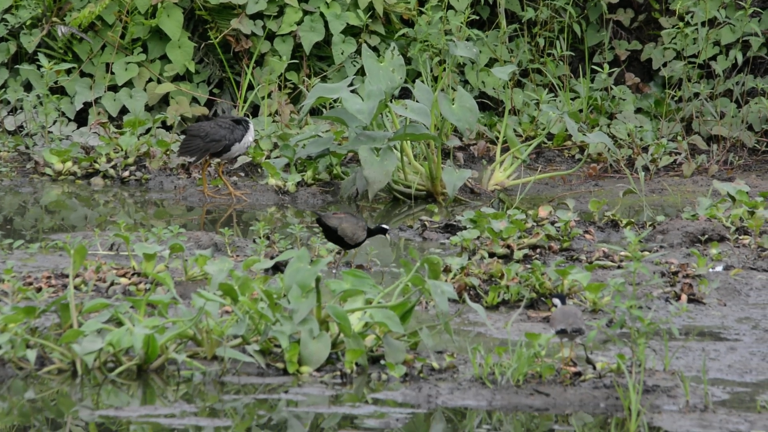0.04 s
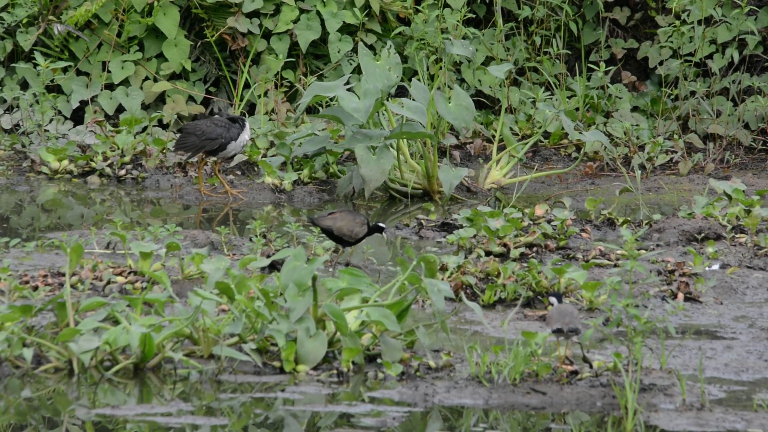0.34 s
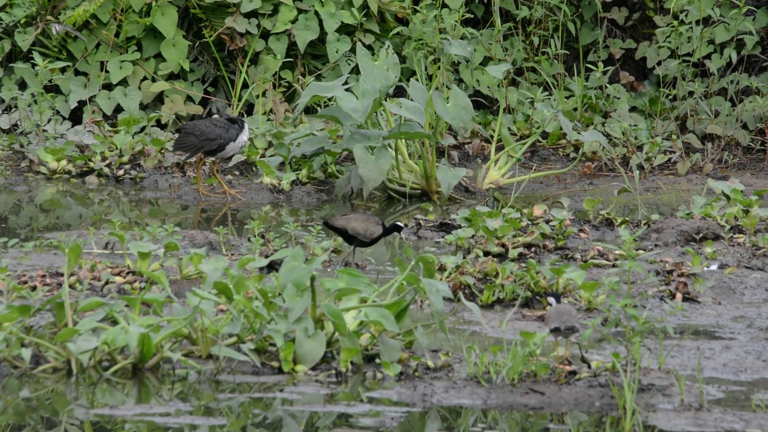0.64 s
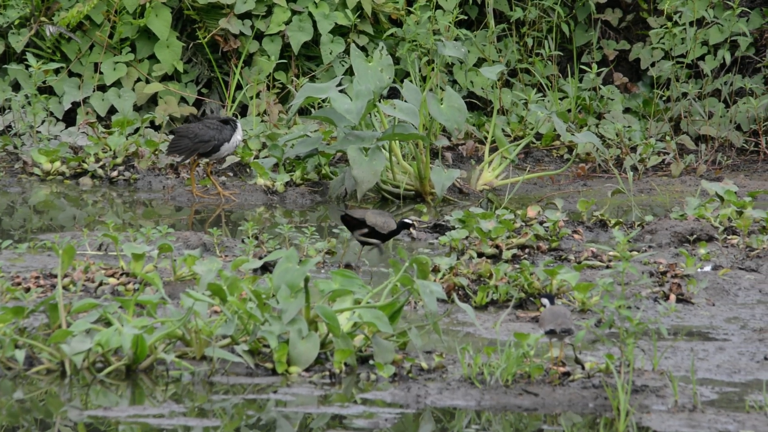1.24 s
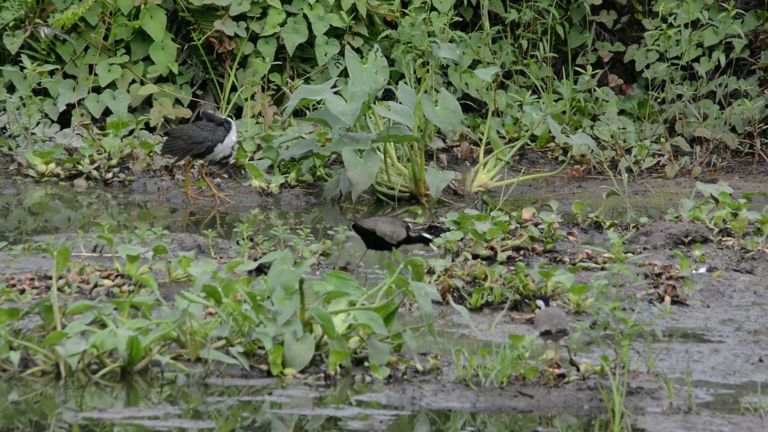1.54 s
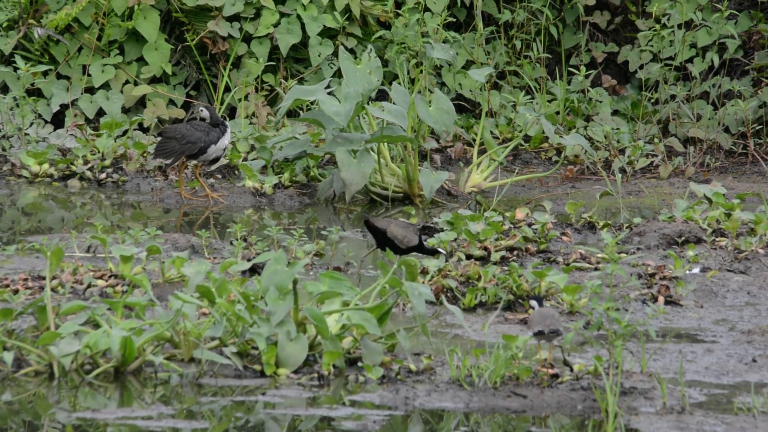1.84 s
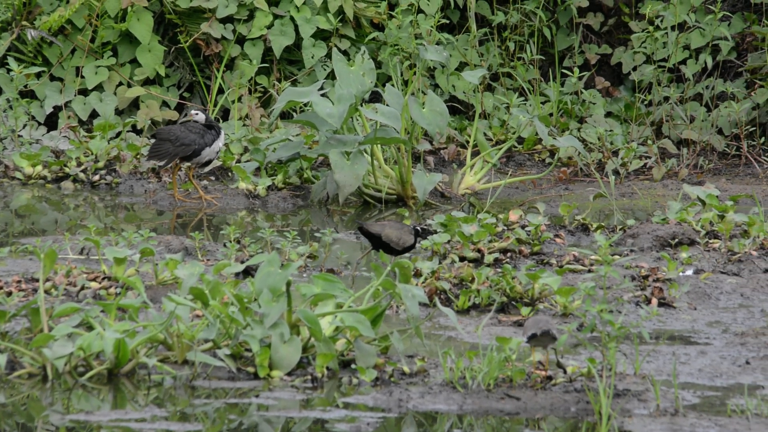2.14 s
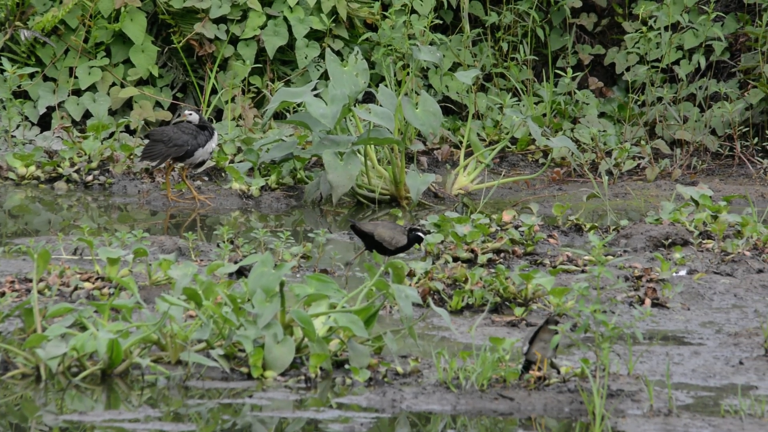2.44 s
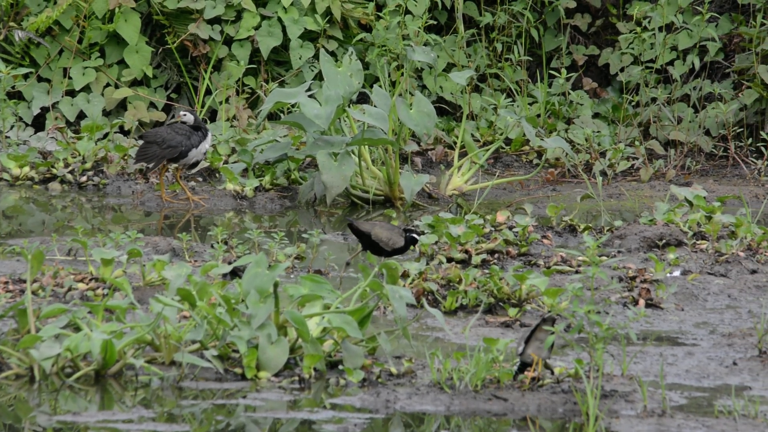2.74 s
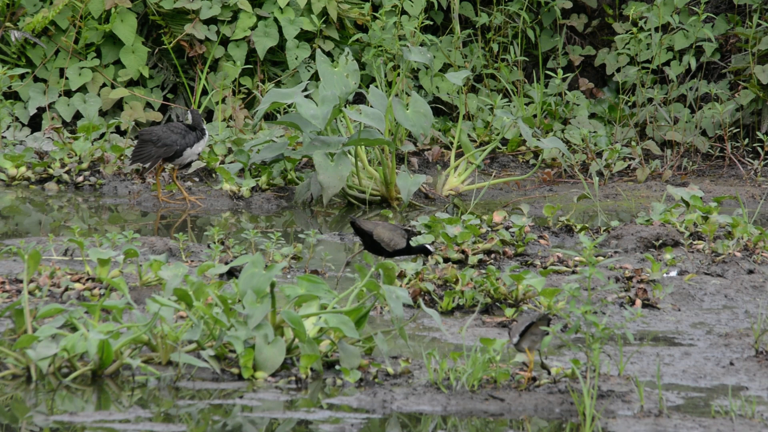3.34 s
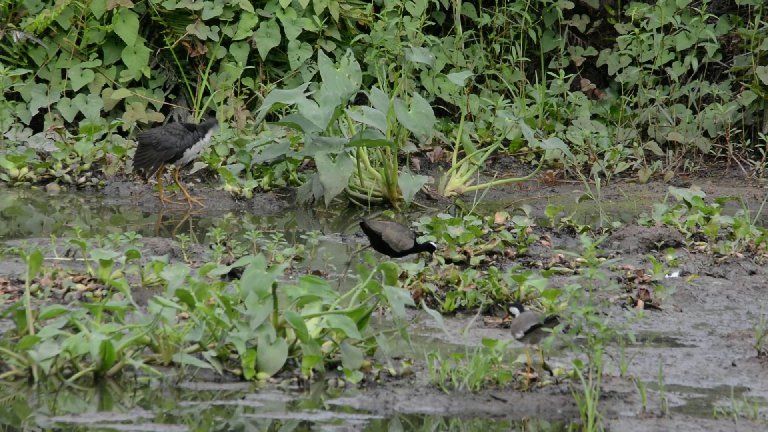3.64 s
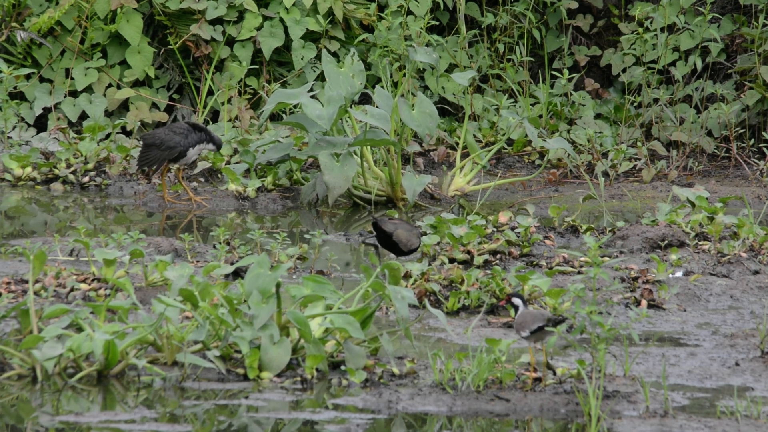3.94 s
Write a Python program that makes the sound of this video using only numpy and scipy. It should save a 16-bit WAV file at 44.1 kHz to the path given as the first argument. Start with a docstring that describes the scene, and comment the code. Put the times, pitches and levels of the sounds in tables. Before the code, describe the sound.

Birds chirp close to the microphone on a marsh bank. Sharp chips and dry bill ticks come first, then slurred whistles, three quick swooping notes and a rasp, over steady shrill insects and faint distant calls.

```python
"""Sharp bird chips close to the microphone, over shrill insects and the low murmur of open air.
The place is the bank of a marsh pond. Nearby come slurred whistles, rising notes, swoops, harsh
rasps and bill ticks; farther off, soft hoots, falling notes and one grunt. Each whistle is the
wavering near-sine of a syrinx; each rasp is hiss with a throat resonance. Foliage scatters every
call, and the wall of leaves across the pond throws back a smeared echo."""
import sys
import numpy as np
from scipy import signal
from scipy.fft import rfft, irfft
from scipy.io import wavfile

SR = 44100
rng = np.random.default_rng(int(sys.argv[2]) if len(sys.argv) > 2 else 0)


def output_pcm(signal):
    """Save a mono or channel-first signal as 16-bit PCM at the path in sys.argv[1].

    Samples are clipped to [-1, 1] before scaling.
    """
    pcm = np.clip(np.atleast_2d(signal).T, -1, 1) * 32767
    wavfile.write(sys.argv[1], SR, np.round(pcm).astype(np.int16))


N = 176400
TIME_S, FREQ_HZ = np.arange(N) / SR, np.fft.rfftfreq(N, 1 / SR)

def undb(db):
    """Decibels to gain."""
    return 10 ** (np.asarray(db) / 20)

def unit(x):
    """Scale to rms 1."""
    return x / np.sqrt(np.mean(x ** 2))

def colour(x, points):
    """Filter by (freq_hz, gain_db) points on a log-frequency axis."""
    hz, db = np.array(points, float).T
    gain_db = np.interp(np.log(np.maximum(FREQ_HZ, 1)), np.log(hz), db)
    return irfft(rfft(x) * undb(gain_db), N)

def noise(points):
    """Coloured noise of rms 1."""
    return unit(colour(rng.standard_normal(N), points))

def band(hz, width_hz):
    """Noise of rms 1 in one steep resonance."""
    skirts = 1 + (1.52 * (FREQ_HZ - hz) / width_hz) ** 4
    return unit(irfft(rfft(rng.standard_normal(N)) / skirts, N))

def walk(rate_hz):
    """Smooth random drift of rms 1, mostly slower than rate_hz."""
    return unit(irfft(rfft(rng.standard_normal(N)) / (1 + (FREQ_HZ / rate_hz) ** 4), N))

def ramp(u):
    """Smooth step from 0 to 1."""
    return np.sin(np.pi / 2 * np.clip(u, 0, 1)) ** 2

def clock(length_s):
    """Sample times of one note."""
    return np.arange(int(length_s * SR) + 1) / SR

def add(out, start_s, x):
    """Mix a sound in at its time."""
    i = int(start_s * SR)
    out[i:i + len(x)] += x[:N - i]

def stereo(mid, side, left_db):
    """Mid and side to the microphone's two channels, the left louder by left_db."""
    return np.array([mid + side, mid - side]) * undb([[left_db / 2], [-left_db / 2]])

# Open air over the pond: freq_hz, gain_db
AIR_SPECTRUM = [(20, -46), (33, -16), (48, -11), (90, -2), (130, -1), (160, -4), (178, -1.5), (193, 2.5),
                (210, -5.5), (240, -4), (500, -1.5), (690, 0), (726, 3), (770, 0), (1250, 0), (1700, -4.5),
                (2900, -6), (4300, -9), (6200, -13), (12500, -23.5), (15500, -18.5)]
# High insect chorus around the microphone: freq_hz, gain_db
CHORUS_SPECTRUM = [(4000, -43), (6200, -18.5), (6800, -4.5), (7400, -10), (8200, -1.5), (8900, 2),
                   (9500, -3.5), (10300, 4), (11000, -3), (11700, -6), (12500, -18), (15500, -30)]
# Waves of the lower insect shrill: time_s, level_db
SHRILL_LEVELS = [(0, -49.5), (.15, -67), (1.1, -65.5), (1.38, -60.5), (1.48, -64.5), (1.8, -58.5),
                 (2.1, -61), (2.5, -60.5), (2.59, -59), (2.7, -65), (2.77, -54.5), (2.91, -64), (2.96, -53),
                 (3.02, -53), (3.11, -64), (3.21, -52.5), (3.27, -55.5), (3.4, -66), (4, -61.5)]
# Stereo width at the microphone, side against mid: freq_hz, gain_db
MARSH_WIDTH = [(30, -11), (100, -21), (300, -11), (700, -11), (1400, -9.5), (3000, -5), (5500, -4.5),
               (9000, -4), (14000, 1)]

def marsh():
    """All round the microphone: open air, a steady insect chorus and a lower shrill in waves."""
    air = undb(-54 + .5 * walk(.67))
    chorus = undb(-53.5 + .17 * walk(9) + .5 * walk(90))
    shrill = undb(np.interp(TIME_S, *np.array(SHRILL_LEVELS).T) + 1.9 * walk(28))
    mid, side = (air * noise(AIR_SPECTRUM) + chorus * noise(CHORUS_SPECTRUM)
                 + shrill * band(hz=5307, width_hz=740) for _ in range(2))
    return stereo(mid, colour(side, MARSH_WIDTH), left_db=1.8)

def leaves(call, wet_db, t60_s=.78):
    """A call reaches the microphone directly, then as many small echoes off the foliage."""
    onset_s, closest_t60_s, echo_s, smear_s = .0027, .14, .0424, .0076
    t = clock(.9)
    closest = undb(4.5 - 60 * t / closest_t60_s)  # the nearest leaves answer most strongly
    deeper = undb(-60 * t / t60_s)
    far_bank = undb(-7) * np.exp(-((t - echo_s) / smear_s) ** 2)
    fade = (closest + deeper) * ramp(t / onset_s) + far_bank
    tails = rng.standard_normal((2, len(t))) * fade / np.sqrt(np.sum(fade ** 2))
    mid, side = (undb(wet_db) * signal.fftconvolve(call, tail)[:N] for tail in tails)
    return stereo(call + mid, undb(-9) * side, left_db=1.3)

def syrinx(hz, db, attack_s, release_s, rough, octave_db=-30):
    """One whistled note: a near sine that wavers and turns hoarse with its roughness."""
    jitter_rate_hz, breath_rate_hz = 300, 830.6
    t = np.arange(len(hz)) / SR
    jitter, breath_a, breath_b = (np.interp(t * rate, np.arange(400), rng.standard_normal(400))
                                  for rate in (jitter_rate_hz, breath_rate_hz, breath_rate_hz))
    phase = 2 * np.pi * np.cumsum(hz * (1 + .04 * rough * jitter)) / SR
    tone = np.sin(phase) + undb(octave_db) * np.sin(2 * phase)
    # A band of noise spread round the note.
    hoarse = rough * undb(.5) * (breath_a * np.sin(phase) + breath_b * np.cos(phase))
    envelope = ramp(t / attack_s) * ramp((t[-1] - t) / release_s)
    return np.sqrt(2) * undb(db) * envelope * (tone + hoarse)

# A hoarse voice far from the microphone: freq_hz, gain_db
GRUNT_SPECTRUM = [(400, -40), (750, -16), (920, 1), (1100, -14), (1280, -3), (1600, -9), (3000, -42)]

def grunt(start_s=2.21, length_s=.11, level_db=-51.5):
    """One soft, low puff of noise, far off."""
    u = (TIME_S - start_s) / length_s
    return undb(level_db) * ramp(2 * u) * ramp(2 - 2 * u) * noise(GRUNT_SPECTRUM)

# A distant bird's falling notes: start_s, from_hz, level_db
FAR_DROPS = [(.295, 1260, -54), (0.511, 1347, -53), (0.576, 1316, -57.5), (0.635, 1328, -50.5),
             (.98, 1304, -56), (1.05, 1403, -57), (1.18, 1311, -53.5), (1.243, 1307, -52.5),
             (1.309, 1342, -50), (1.696, 1280, -53.5), (1.867, 1306, -52), (1.928, 1310, -53),
             (2.013, 1162, -57), (2.43, 1250, -54.5), (2.575, 1322, -50.5), (2.639, 1317, -51.5),
             (3.272, 1327, -52), (3.332, 1277, -51), (3.967, 1328, -50)]
# The pips that open and close its phrases: start_s, pitch_hz, level_db
FAR_PIPS = [(.24, 1380, -49.5), (.923, 1383, -50.5), (1.99, 1293, -48.5), (2.375, 1380, -48.5),
            (2.708, 1258, -47), (3.397, 1280, -46.5)]

def distant_bird(drop_s=.04, pip_s=.031):
    """Far-off phrases of short falling whistles and hoarser pips of even pitch."""
    out = np.zeros(N)
    fall = 1 - .267 * (clock(drop_s) / drop_s) ** 1.436
    for start, hz, db in FAR_DROPS:
        add(out, start, syrinx(hz * fall, db, attack_s=.0049, release_s=.0089, rough=.073))
    for start, hz, db in FAR_PIPS:
        pitch = np.full_like(clock(pip_s), hz)
        add(out, start, syrinx(pitch, db, attack_s=.014, release_s=.028, rough=.31))
    return out

# Low hoots and a few thin, high whistles deep in the thicket: start_s, length_s, top_hz, level_db
THICKET_HOOTS = [(0.844, 0.091, 2990, -52.5), (.925, 0.032, 1540, -54), (0.932, 0.045, 2660, -64),
                 (1.134, 0.12, 2920, -65), (1.329, 0.081, 1563, -48.5), (1.352, .08, 2926, -59),
                 (1.372, .1, 4100, -63), (1.552, 0.031, 3640, -56), (1.575, 0.1, 1656, -45.5),
                 (1.804, 0.108, 1508, -50), (3.373, 0.061, 1676, -47.5), (3.429, 0.13, 1643, -45),
                 (3.688, 0.14, 1683, -43), (3.796, 0.083, 1580, -48.5), (3.943, 0.086, 1523, -46),
                 (3.74, .1, 15100, -66)]

def hoots():
    """Soft, distant notes that swell and fade while their pitch arches."""
    out = np.zeros(N)
    for start, length, top_hz, db in THICKET_HOOTS:
        u = clock(length) / length
        pitch = top_hz * (1 - .365 * (u - .386) ** 2)
        add(out, start, syrinx(pitch, db, length / 2, length / 2, rough=.13, octave_db=-21))
    return out

# Harsh calls nearby: start_s, swell_s, hold_s, level_db, throat_hz, throat_gain_db
NEAR_RASPS = [(0.181, 0.082, 0.12, -53.5, 3670, -0.5), (2.382, 0.26, 0.069, -53, 3520, -2.5),
              (3.358, 0.22, 0.21, -45, 4200, -7.5), (3.655, 0.12, 0.013, -50, 4150, -1)]
# Their hiss: freq_hz, gain_db
RASP_SPECTRUM = [(700, -40), (1400, -6), (1850, -5), (2150, -5), (2600, -3), (3000, 0), (3500, -4.5),
                 (4000, -2), (4350, -7.5), (4750, -9), (5800, -11.5), (6400, -16), (7500, -14),
                 (11000, -23), (15500, -33)]

def rasps(release_s=.042, flutter_hz=103.5, flutter_depth=.16):
    """Fluttering hisses with a throat resonance; they swell and break off."""
    out = np.zeros(N)
    hiss = noise(RASP_SPECTRUM)
    for start, swell, hold, db, throat_hz, throat_db in NEAR_RASPS:
        age = TIME_S - start
        effort = ramp(age / swell) * ramp((swell + hold - age) / release_s + 1)
        throat = undb(throat_db) * band(throat_hz, width_hz=480)
        out += undb(db) * effort * (hiss + throat)
    flutter_phase = 2 * np.pi * np.cumsum(flutter_hz * (1 + .22 * walk(34))) / SR
    return out * (1 + flutter_depth * np.sin(flutter_phase))

# A bill ticking near the microphone: start_s, level_db, decay_s
BILL_TICKS = [(.309, -40.5, 0.0031), (0.4782, -43.5, .007), (0.647, -42.5, 0.0028), (0.837, -45.5, 0.004),
              (1.05, -44.5, 0.0062), (1.269, -45, 0.013), (1.502, -41, 0.0047), (1.509, -49, 0.019)]
# Its snap: freq_hz, gain_db
BILL_SPECTRUM = [(500, -11), (1300, -7), (1900, 1.5), (2900, 0.5), (3700, -7), (6000, -14), (14000, -36)]

def bill_ticks():
    """Dry snaps of a bill: noise that starts at once and dies within moments."""
    envelope = sum(undb(db) * (TIME_S >= start) * np.exp(-np.abs(TIME_S - start) / decay)
                   for start, db, decay in BILL_TICKS)
    return noise(BILL_SPECTRUM) * envelope

# Rising notes on the near bank: start_s, length_s, from_hz, to_hz, level_db
NEAR_RISES = [(0.173, 0.079, 3600, 6600, -53.5), (2.029, .035, 1880, 2190, -55),
              (2.072, 0.051, 2420, 2704, -60), (2.589, 0.036, 3366, 3790, -51.5),
              (2.727, 0.059, 3460, 3920, -52), (2.856, 0.052, 3560, 3975, -51.5)]

def rises():
    """Quiet whistles that climb and level off."""
    out = np.zeros(N)
    for start, length, from_hz, to_hz, db in NEAR_RISES:
        u = clock(length) / length
        pitch = to_hz + (from_hz - to_hz) * np.abs(1 - u) ** 2.6
        add(out, start, syrinx(pitch, db, length * .067, length * .36, rough=.12))
    return out

# Chips close to the microphone: start_s, length_s, from_hz, to_hz, level_db
NEAR_CHIPS = [(0.022, 0.017, 5430, 4420, -42), (0.033, .012, 4360, 3180, -45),
              (0.256, 0.027, 5940, 1650, -40), (1.763, 0.0178, 2290, 1480, -50),
              (1.905, 0.041, 2410, 1178, -45), (1.266, 0.021, 2700, 1680, -53),
              (1.634, 0.025, 2200, 1880, -51), (2.318, 0.035, 2060, 1900, -57),
              (2.736, 0.021, 5800, 5070, -59)]

def chips():
    """Very short whistles that fall ever faster."""
    out = np.zeros(N)
    for start, length, from_hz, to_hz, db in NEAR_CHIPS:
        u = clock(length) / length
        pitch = from_hz + (to_hz - from_hz) * u ** 1.6
        add(out, start, syrinx(pitch, db, length * .36, length * .41, rough=.11))
    return out

# Swoops on the near bank: start_s, length_s, floor_hz, end_hz, level_db, dive_gain_db
NEAR_SWOOPS = [(2.824, 0.073, 2193, 3160, -40.5, -16), (2.981, 0.069, 2490, 3190, -41, -6.5),
               (3.14, 0.082, 2540, 3220, -40.5, -9)]

def swoops(dive_hz=2170, dive_s=.0079, climb_from_s=.025, climb_s=.045):
    """Whistles that dive softly, then grow louder as they climb again."""
    out = np.zeros(N)
    for start, length, floor_hz, end_hz, db, dive_db in NEAR_SWOOPS:
        t = clock(length)
        climb = ramp((t - climb_from_s) / climb_s)
        pitch = floor_hz + dive_hz * np.exp(-t / dive_s) + (end_hz - floor_hz) * climb
        level = db + dive_db * (1 - ramp(climb * 1.17))
        add(out, start, syrinx(pitch, level, attack_s=.002, release_s=.01, rough=.097))
    return out

# Slurred whistles close to the microphone:
# start_s, hold_s, slide_s, pitch_hz, end_hz, level_db, slide_gain_db, roughness
NEAR_SLURS = [(1.616, .125, 0.024, 2970, 1785, -43.5, -2, 0.48),
              (1.824, .068, 0.0143, 3361, 1950, -38.5, -4, 0.13),
              (3.746, .062, 0.12, 3810, 2080, -41, -4, 0.11)]

def slurs(sag=.0403, swell_db=5, bend_per_s=48):
    """A held whistle swells and sags a little in pitch, then slides down."""
    out = np.zeros(N)
    for start, hold, slide, hz, end_hz, db, slide_db, rough in NEAR_SLURS:
        t = clock(hold + slide)
        u = np.clip((t - hold) / slide, 0, 1)
        bend = bend_per_s * slide  # a longer slide levels out more
        fall = np.expm1(-bend * u ** 1.4) / np.expm1(-bend)
        held_hz = hz * (1 - sag * np.minimum(t / hold, 1) ** 2)
        pitch = held_hz + (end_hz - held_hz) * fall
        level = db + swell_db * (ramp(t / hold) - 1) + slide_db * ramp(2 * u)
        add(out, start, syrinx(pitch, level, .004, slide / 3, rough, octave_db=-27))
    return out

def scene():
    """Near and far birds over the marsh, from a stereo microphone on the bank."""
    near = leaves(slurs() + chips() + rises() + swoops(), wet_db=-2.5)
    far = leaves(distant_bird() + grunt(), wet_db=-7.5)
    thicket = leaves(hoots(), wet_db=-7, t60_s=1)
    harsh = leaves(rasps() + bill_ticks(), wet_db=-4)
    return marsh() + far + thicket + harsh + near

def record(dry, top_hz=15750):
    """The recorder cuts the highest treble steeply."""
    return signal.sosfilt(signal.ellip(10, .2, 70, top_hz, fs=SR, output="sos"), dry)

dry = scene()
out = record(dry)
output_pcm(out)
```